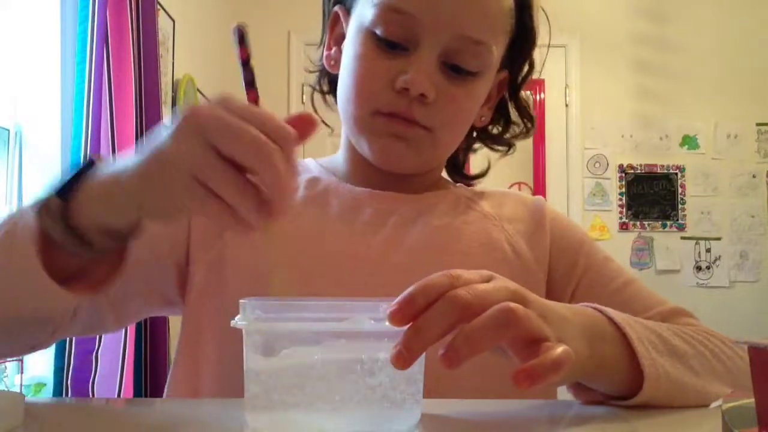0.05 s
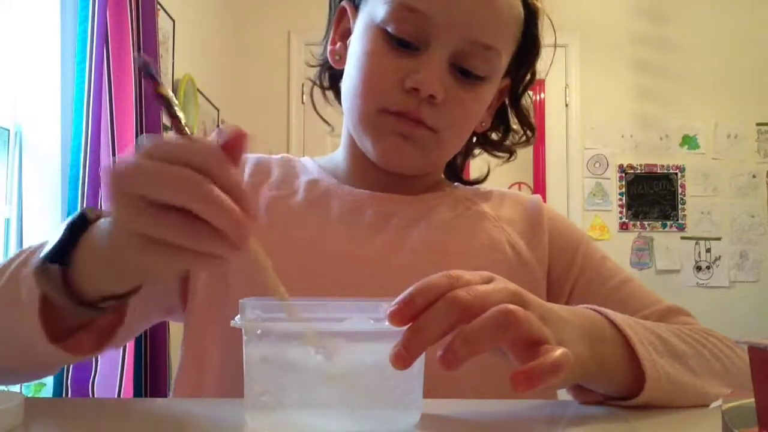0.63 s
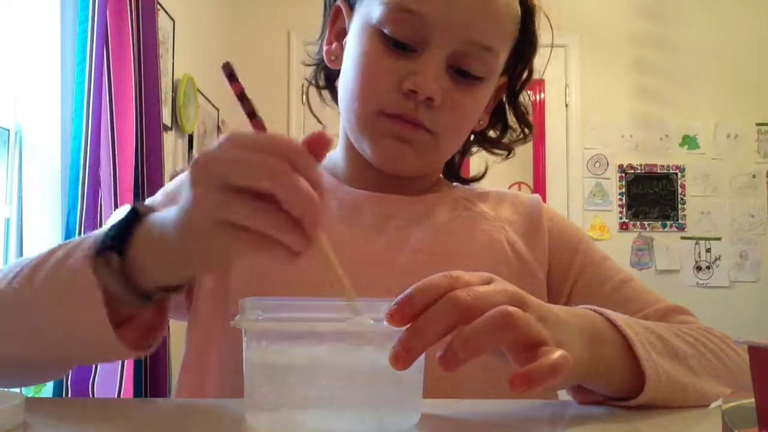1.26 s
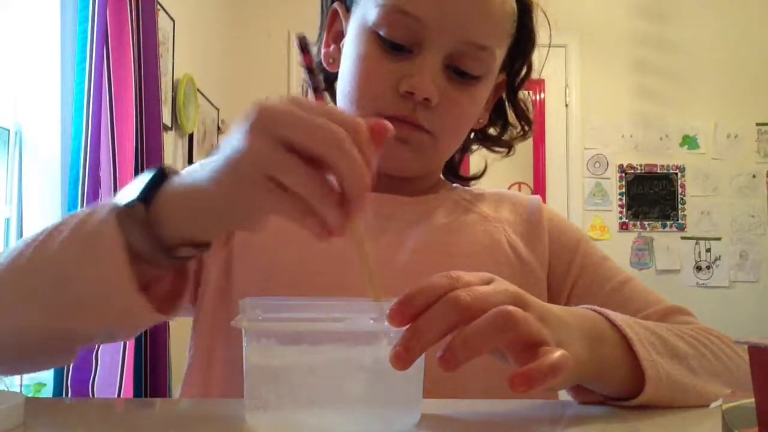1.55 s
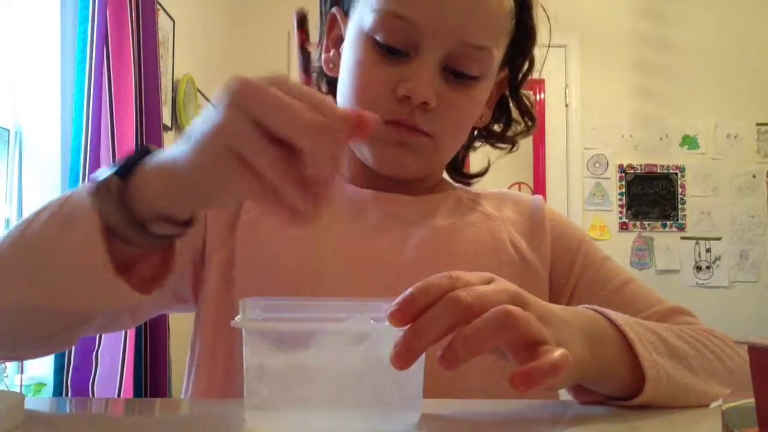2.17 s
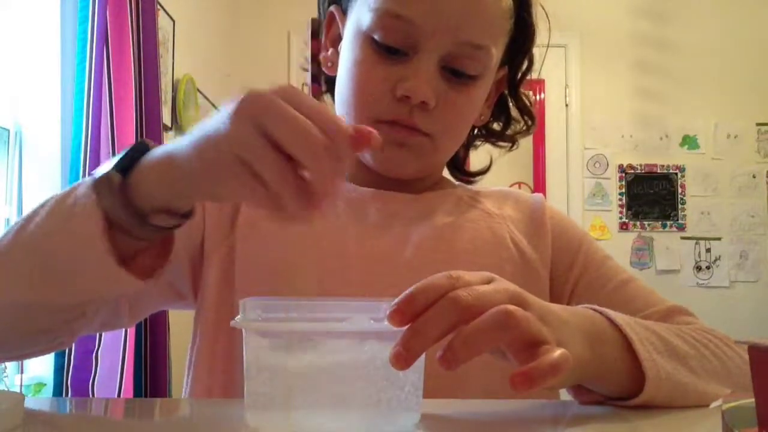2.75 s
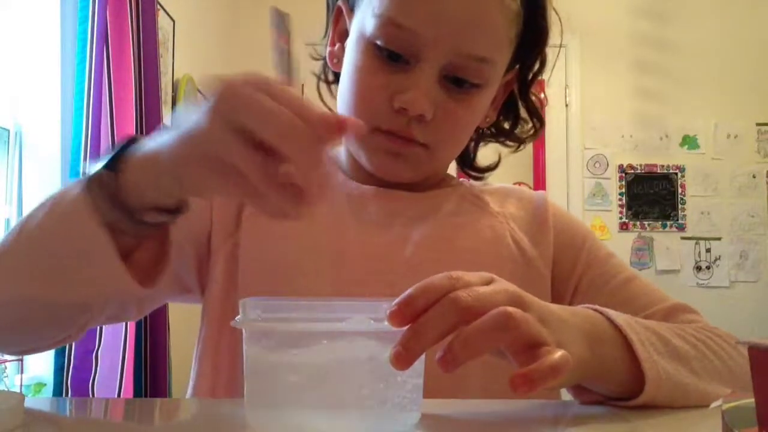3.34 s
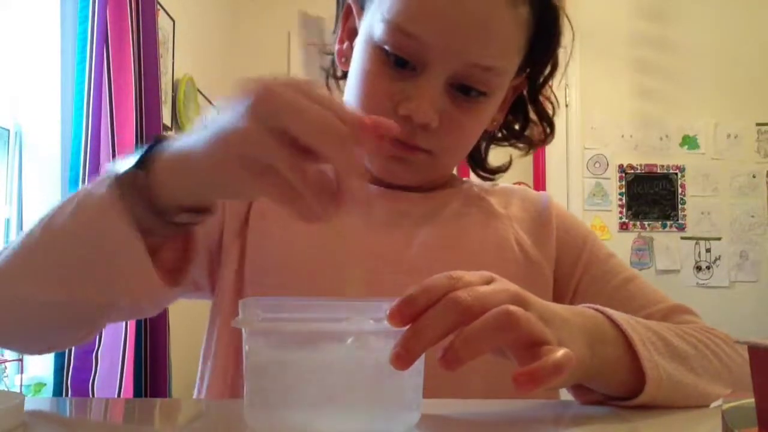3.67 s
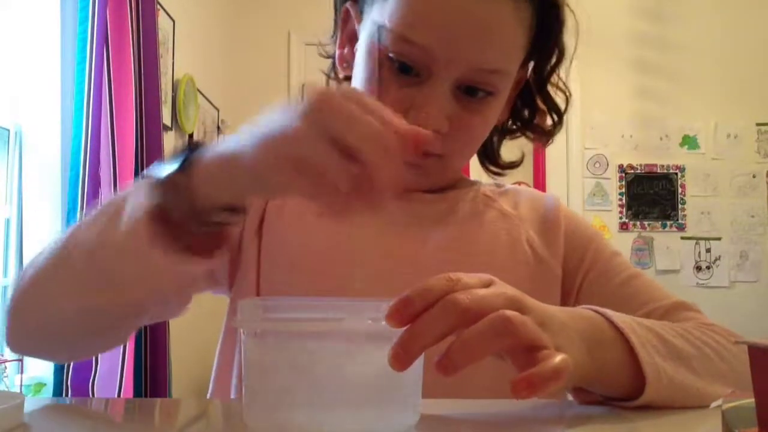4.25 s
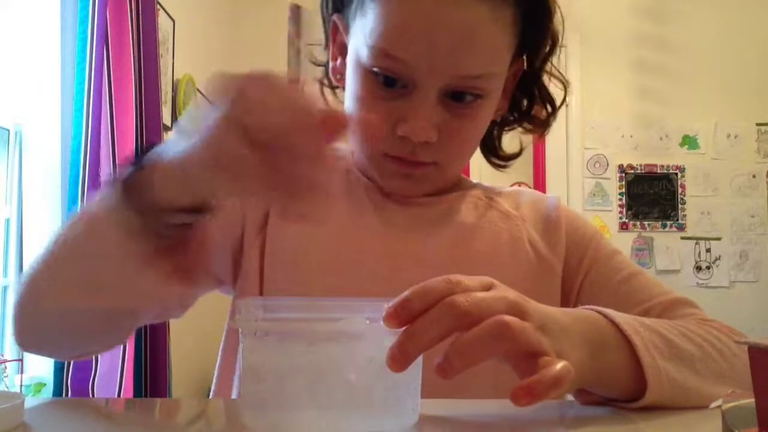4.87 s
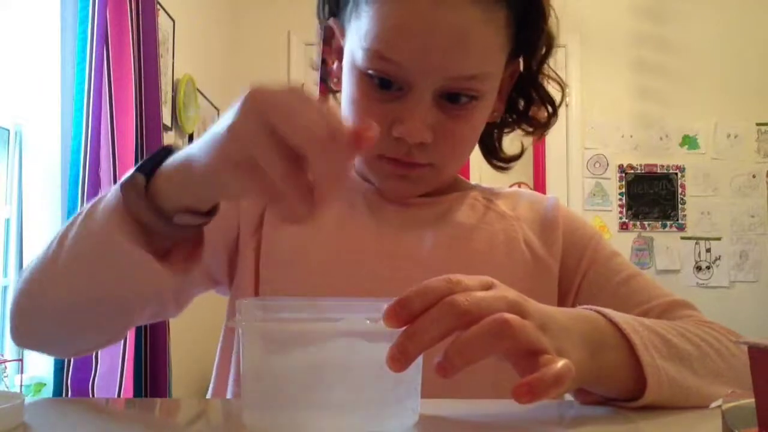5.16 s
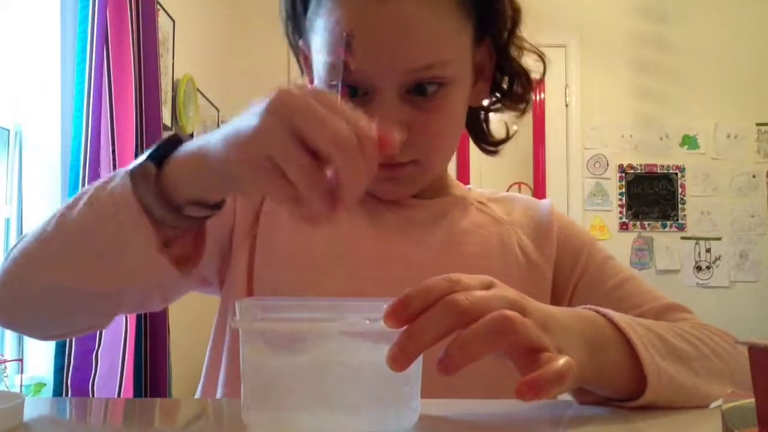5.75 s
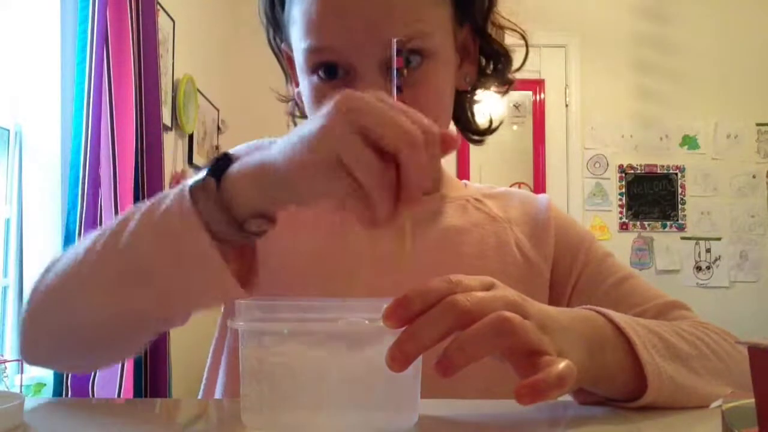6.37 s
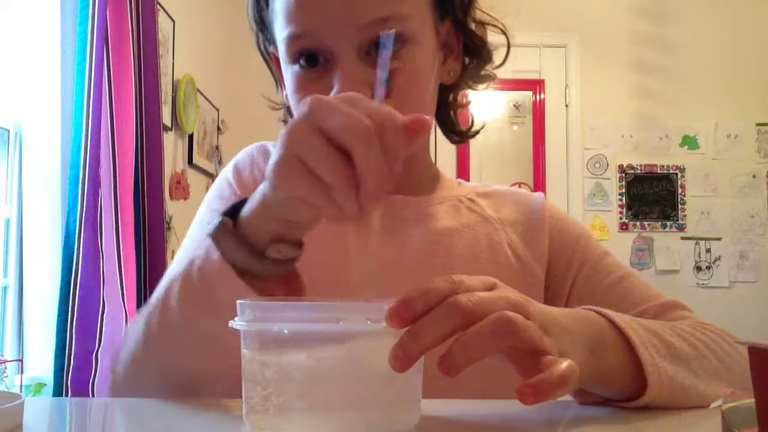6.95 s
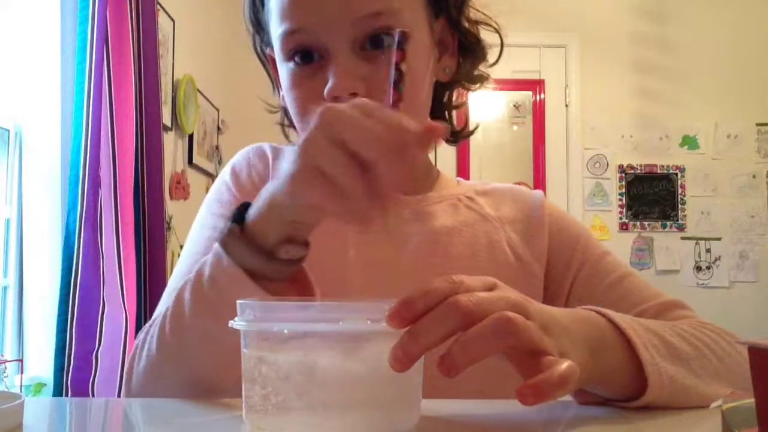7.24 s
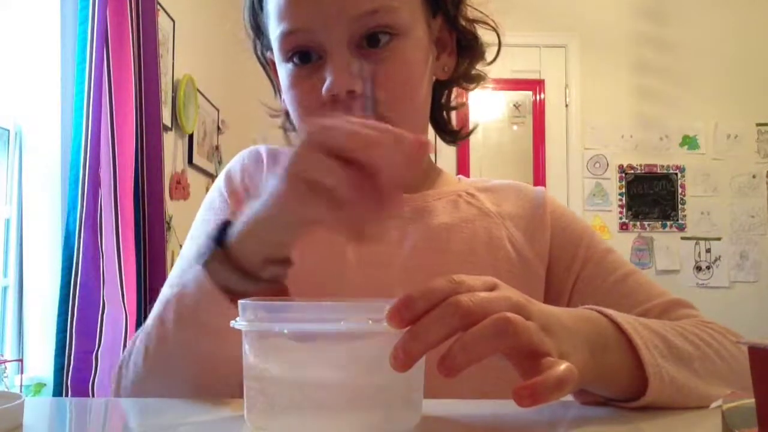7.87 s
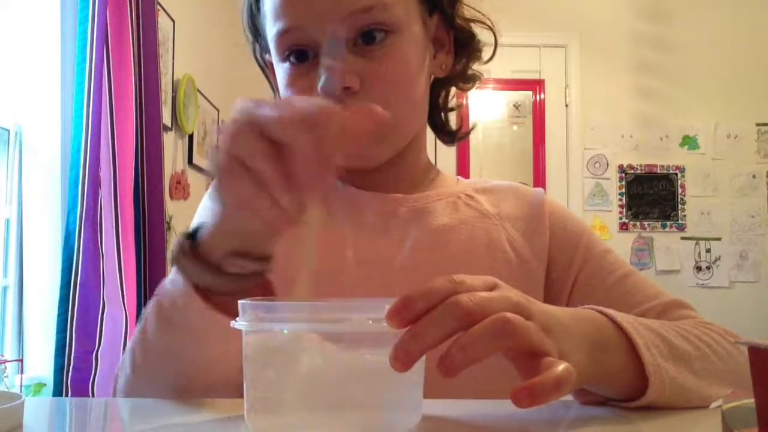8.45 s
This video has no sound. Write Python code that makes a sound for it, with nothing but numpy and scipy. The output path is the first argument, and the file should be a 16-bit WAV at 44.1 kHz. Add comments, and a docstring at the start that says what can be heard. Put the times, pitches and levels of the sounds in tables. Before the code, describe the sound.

A stick stirs a thick, foamy mixture in a plastic tub, with quick hollow knocks, short scrapes and soft squelches.

```python
"""Hollow knocks and short scrapes come several times a turn as a chopstick stirs a thick mixture in a
thin plastic tub. Each contact excites the tub's damped modes; the last few snap hard on the plastic.
Between the knocks the mixture churns and squelches, and its foam crackles with bursting bubbles.
Twice a short knock stutters, repeating evenly about every 23 ms over deep bass pulses.
A small room reverberates around the contacts, over a faint hiss."""
import sys
import numpy as np
from scipy import signal
from scipy.fft import rfft, irfft
from scipy.io import wavfile

SR = 44100
rng = np.random.default_rng(int(sys.argv[2]) if len(sys.argv) > 2 else 0)


def log_audio(samples):
    """Write samples as a 16-bit WAV file to the path given in sys.argv[1]."""
    # one column per channel
    frames = np.atleast_2d(samples).T
    # limit to full scale, then quantise
    limited = np.clip(frames, -1, 1)
    pcm = np.round(limited * 32767).astype(np.int16)
    wavfile.write(sys.argv[1], SR, pcm)


N = 375280

# spectra of the hiss, the churning mass and the foam: f/Hz, relative spectral density/dB
HISS_SPECTRUM = [(30, -19), (100, -50), (230, 20.5), (330, -5.5), (700, 8), (1100, 1), (2500, 2.5),
                 (5000, -1.5), (10000, -1.5), (15500, -5.5)]
CHURN_SPECTRUM = [(40, -24), (110, -8), (150, 4), (190, -1.5), (245, 0.5), (300, -6.5), (365, -25),
                  (460, -3), (590, -13.5), (665, -13.5), (735, -15), (810, -11.5), (950, -16),
                  (2000, -31.5)]
FOAM_SPECTRUM = [(500, -37), (1000, 4), (1450, 5), (1850, 14), (2100, -6), (2420, 17.5), (2850, -6),
                 (3300, -7), (4200, -38), (5600, 6), (6800, -16), (9500, 1), (15000, -20)]
# spectra of a crack's snap and of its higher sheen: f/Hz, relative spectral density/dB
SNAP_SPECTRUM = [(1500, -13), (3000, 6), (3900, 5.5), (4600, 5), (5300, 3.5), (6200, 3.5), (7000, -25),
                 (9000, -26.5), (15500, -54)]
SHEEN_SPECTRUM = [(3000, -45), (6300, 1), (7800, 6.5), (9200, 2.5), (10500, -0.5), (12500, -8),
                  (15500, -5.5)]
# reverberation in octave bands: f/Hz, t60/s, level/dB
ROOM_BANDS = [(151, 0.31, -10.5), (284, 0.42, -16.5), (572, 0.21, -16), (1110, 0.22, -19.5),
              (2260, 0.24, -16), (4300, 0.16, -11), (9100, 0.18, -13)]
# course of the stirring: t/s, churn level/dB, relative foam level/dB
STIR_LEVELS = [(0.0, -76, -83), (0.35, -73, -77), (0.64, -71.5, -75), (1.35, -67.5, -78), (2.56, -64, -73),
               (2.79, -60.5, -73.5), (3.34, -58, -66.5), (3.6, -59.5, -67), (3.93, -64, -70),
               (4.71, -57, -66), (5.07, -63, -75.5), (5.4, -61, -68.5), (5.94, -60.5, -71.5),
               (6.84, -63, -69), (7.55, -63.5, -79), (7.81, -70, -89), (8.21, -62.5, -70),
               (8.5, -67.5, -87)]
# the stick cuts in and out of the mixture: t/s, relative level/dB, centre f/Hz, swell time/s
SQUELCH_EVENTS = [(0.546, -56, 2560, .005), (0.584, -56, 2690, 0.0037), (0.823, -57, 2380, 0.0053),
                  (0.857, -57, 3100, .004), (1.049, -53, 4170, 0.0023), (1.868, -52.5, 2730, .005),
                  (2.598, -51.5, 2850, 0.0063), (2.975, -52.5, 2800, .008), (3.226, -53, 3300, 0.0072),
                  (3.47, -56, 2560, .005), (3.751, -53, 2350, .005), (4.137, -58, 2400, 0.0042),
                  (4.541, -47, 3000, 0.0039), (4.705, -46, 2920, 0.0039), (4.78, -49, 3600, .009),
                  (5.524, -55, 2400, .005), (5.789, -49, 3000, .002), (6.155, -51, 2390, 0.0053),
                  (6.226, -49, 3730, 0.0046), (6.47, -51, 4200, 0.0043), (7.268, -47, 2900, .007)]
# a short knock stutters: t/s, duration/s, knock/dB, thump/dB, hardness/dB, bass pulse/dB
STUTTERS = [(6.1794, .035, -45.5, 5, -12, -58), (6.606, .082, -55.5, 3, -16, -71)]
# the stick strikes bare spots of the wall: t/s, level/dB, f/Hz
WALL_PINGS = [(0.3602, -48, 2560), (4.0391, -40.5, 3080), (4.5096, -50, 4740), (4.6042, -48, 3200),
              (5.2572, -40, 5600), (5.4544, -41.5, 5460), (8.0986, -39, 6140), (8.3509, -44, 2570)]
# stick on tub: t/s, knock/dB, thump of the loaded base/dB, hardness/dB, snap/dB, drag time/ms
# thump, hardness and snap are relative to the knock; a touch cushioned by mixture has low hardness
STICK_CONTACTS = [(0.1422, -55.5, 2, -14, -14, 0.9), (0.165, -54, -6.5, -14, -28, 0.7),
                  (0.2097, -52, -11, -13, -13.5, 1), (0.3602, -40.5, -0.5, -7.5, -18.5, 0.41),
                  (0.5093, -44.5, 0, 1, -9.5, 1.3), (0.6246, -39.5, -3, -8.5, -20, 0.25),
                  (0.7396, -53.5, 5.5, -1.5, -9, 0.95), (0.8905, -44.0, 2, -20, -29.0, 1.8),
                  (0.912, -52, -8, -22, -29, 0.9), (0.9976, -40, -3, -12.5, -24, 0.4),
                  (1.096, -56, 3, 0, -19, 2.7), (1.1676, -49.5, -2, -4, -25, 1.1),
                  (1.179, -47.0, -5.0, -22, -33, 0.9), (1.2656, -39.0, -6, -14.5, -21.5, 0.82),
                  (1.321, -55.5, 3, -6, -16, 1.2), (1.4299, -37.5, -3.5, -11.0, -28, 0.9),
                  (1.4659, -45.5, -5, -7, -27, 0.9), (1.5476, -42.5, -6.5, -22, -36, 1.8),
                  (1.558, -45.0, -10, -12, -28, 0.9), (1.6174, -58, 4.5, 10.5, -5, 0.82),
                  (1.7275, -43.0, -3.5, -7.5, -38, 0.9), (1.758, -53, -5, -11, -21, 0.3),
                  (1.8426, -43.5, -4, -13.5, -25, 7.6), (2.198, -36.5, -3.0, -9.5, -29, 0.71),
                  (2.3117, -59, 6, 8.5, -4.0, 7), (2.6424, -35.5, 9.0, -13, -15.5, 3.7),
                  (2.8476, -48.5, 5, -16, -22, 1.7), (3.092, -39, 5, -5, -22, 1.1),
                  (3.113, -50.5, 2, -18, -16, 1.6), (3.2504, -37, 6.5, -1.0, -14.5, 0.42),
                  (3.273, -39.0, 9.0, -9.5, -19, 1.4), (3.3356, -42.5, 3, -3.5, -21, 0.21),
                  (3.361, -57, 6, 7.5, -1, 0.97), (3.4314, -39, 3.0, -7, -31, 1.1),
                  (3.594, -39.5, 3.5, -8.0, -28, 1.1), (3.6667, -46.5, 2, -12, -12.5, 16),
                  (3.7894, -40, -11.0, -4.5, -27, 1.3), (3.8812, -57.0, 5, -7, -13, 0.9),
                  (3.948, -38.0, -6.0, -5.5, -17, 1.6), (3.975, -48.5, -12, -8, -21, 0.36),
                  (4.0391, -41.5, -8, 2.5, -6, 0.3), (4.049, -36.0, -3.5, -16, -15, 4.8),
                  (4.0886, -49.5, 2, -8.0, -14.0, 0.99), (4.165, -45.5, 5.0, -6.5, -14, 1.1),
                  (4.2327, -37.5, -13, -3.5, -12, 2), (4.4368, -48.5, 6.5, -5.0, -16, 0.9),
                  (4.5096, -35.5, -7.0, -7.5, -7.5, 0.63), (4.6042, -36, 2, -2, -18.0, 0.33),
                  (4.7388, -38.5, -12, -18.5, -28.0, 0.9), (4.803, -67, 17, 9, 6, 2.2),
                  (4.87, -57.5, -1, -4, -6, 0.4), (4.8833, -39.5, -3.5, -19, -27, 0.82),
                  (4.9555, -41, -6.5, -18, -25.0, 0.71), (5.0716, -41, -4.5, -24, -27, 0.68),
                  (5.083, -41, -11, -19, -28.0, 3.7), (5.1396, -44.5, -2, -15.5, -26.0, 0.62),
                  (5.2298, -46, -1, -7, -12, 8.1), (5.2572, -35, -1.5, -3.5, -10.5, 0.35),
                  (5.344, -50.5, 7, -15, -10.5, 8.1), (5.359, -40.5, 3, -5.5, -28, 0.24),
                  (5.4544, -34.5, -1.0, 0.5, -5, 0.34), (5.4909, -45.5, -4, -5, -14, 1.1),
                  (5.563, -46.5, 2, -9, -20, 10.4), (5.6632, -49.5, -1, -1, -14, 4.5),
                  (5.681, -50, -16, -3.5, -7.5, 1.9), (5.7571, -47.5, -2, -17, -23, 0.9),
                  (5.8207, -55, -1, -10, -17, 5.3), (5.8477, -39.5, -11, -8.5, -17, 5),
                  (5.889, -50.5, -6, -9, -20, 0.37), (6.0221, -41.5, -7, -11, -31, 2.2),
                  (6.114, -52.0, -4, -11, -17, 0.97), (6.2463, -36.5, -9.5, -8.5, -24.0, 1),
                  (6.2905, -54.5, -10, -24, -29, 4.9), (6.3546, -54.0, 2.5, -4, -8, 0.83),
                  (6.4166, -50, -0.5, -11, -29, 4.6), (6.4519, -58, 5, 2, -12, 0.45),
                  (6.4892, -38.5, -9, -7.0, -33, 0.67), (6.5706, -45.5, -2, -23, -33, 0.9),
                  (6.591, -53, -8, -4, -3, 0.9), (6.7062, -50, 1, -14, -30, 1.4),
                  (6.7844, -47, 0.5, -24.0, -28, 1), (6.8539, -41, 2, -0.5, -6, 2.3),
                  (6.864, -42, 5.5, -6, -22, 2.6), (6.9415, -35, -12, -11, -25, 0.72),
                  (6.9961, -38.5, -7.5, -19, -45, 1), (7.0929, -34, -6, -20.5, -39, 3.5),
                  (7.1991, -45.0, -5.5, -20, -36.0, 0.82), (7.2242, -45.5, -8, -7, -31.0, 0.83),
                  (7.331, -51.5, -5, -13.0, -26, 0.68), (7.4095, -56.5, -4, -13, -27, 1.3),
                  (7.4458, -46.5, -7, -30, -34.0, 1.2), (7.5853, -57, -5, -11, -16, 19),
                  (7.739, -47, -8, -21, -37, 4.6), (7.78, -44, -11, -27, -34.0, 3),
                  (7.8802, -48, -10.0, -13, -6, 1.6), (7.898, -35.0, -8, -11.0, -24, 4.7),
                  (8.0275, -43.0, -1.5, -8, -25.0, 0.2), (8.0986, -37, -4.5, -2, 4.5, 0.57),
                  (8.1924, -48, -7, -4.5, -8.5, 1), (8.232, -55.5, -4, 4, 4, 0.74),
                  (8.242, -44.5, 2.5, -21, -14, 0.9), (8.3509, -36.0, 3.5, -6, -14.5, 0.3),
                  (8.4166, -38, -10, -2.5, 3, 0.61)]
# modes of the loaded tub: f/Hz, relative level/dB, t60/s
TUB_MODES = [(126.7, -7.5, 0.13), (161, 1.5, 0.098), (210.4, 1.5, 0.097), (246.6, 4.5, 0.099),
             (452.3, -16, 0.11), (458.6, 8, 0.047), (542, -14, 0.15), (600.7, -6.5, 0.025), (667, 0, 0.06),
             (795, 3, 0.03), (862, -3.5, 0.043), (1110, -6, 0.091), (1240, -3, 0.021), (1405.6, 7, 0.048),
             (1533, 1, 0.064), (1816, 9.5, 0.024), (1910, -1.5, 0.06), (2374, 12.5, 0.017),
             (2507, 9, 0.017), (2620, 5.5, 0.0082), (3186, 3, 0.015)]
# registers (thump, hollow, knock, clack, tick): low f/Hz, high f/Hz, gain/dB, thud re ring/dB, thud t60/s
TUB_REGISTERS = [(104, 446, -0.38, -13, 0.17), (384, 676, 1.1, -12, 0.025),
                 (600.7, 890, -0.78, -5.5, 0.017), (960, 1910, 0.62, -2, 0.02),
                 (1985, 3110, -2.05, -5.5, 0.01)]


def from_db(db):
    return 10 ** (np.asarray(db) / 20)


def rms_one(x):
    return x / np.sqrt(np.mean(x ** 2) + 1e-20)


def energy_one(x):
    return x / np.sqrt(np.sum(x ** 2) + 1e-20)


def at_level(x, db, span_s=.01):
    """Equivalent level: a transient gets the energy of a steady sound at db lasting span_s."""
    return np.sqrt(span_s * SR) * from_db(db) * energy_one(x)


def time_axis(length_s):
    return np.arange(int(length_s * SR)) / SR


def add(out, part, s):
    """Superposition: a sound joins the mix at time s."""
    start = max(0, round(s * SR))
    out[start:start + len(part)] += part[:len(out) - start]


def band(x, low_hz, high_hz):
    return signal.sosfilt(signal.butter(2, [low_hz, high_hz], "band", fs=SR, output="sos"), x)


def shaped(x, spectrum):
    """Linear filtering imposes a spectrum; a white input keeps its power."""
    hz, db = np.transpose(spectrum)
    grid_hz = np.maximum(np.fft.rfftfreq(N, 1 / SR), 1)
    gain = from_db(np.interp(np.log(grid_hz), np.log(hz), db))
    return irfft(rfft(x) * rms_one(gain), N)


def drift(per_s):
    """Random modulation: a line through Gaussian values of unit spread."""
    return np.interp(np.arange(N) / SR * per_s, np.arange(4096), rng.standard_normal(4096))


def burst(t, t60):
    """Modal overlap: countless heavily damped modes blur into a dying noise."""
    return rng.standard_normal(len(t)) * from_db(-60 * t / t60)


def hiss(level_db=-68):
    """Stationary coloured noise forms a faint floor."""
    return from_db(level_db) * rms_one(shaped(rng.standard_normal(N), HISS_SPECTRUM))


def room(x, first_echo_s=.007):
    """Reverberation: dense reflections decay exponentially, each octave at its own rate."""
    t = time_axis(.5)
    tail = np.zeros(len(t))
    for hz, t60, db in ROOM_BANDS:
        low_hz = hz / np.sqrt(2)
        echoes = band(rng.standard_normal(len(t)), low_hz, 2 * low_hz) * from_db(-60 * t / t60)
        bandwidth_gain = np.sqrt(low_hz / (SR / 2))
        add(tail, from_db(db) * bandwidth_gain * energy_one(echoes), first_echo_s)
    return signal.fftconvolve(x, tail)[:N]


def mixture(lumps_per_s=35, pops_per_s=450, lump_spread_db=4, clump_spread_db=3):
    """Modulated noise and shot noise: the mass churns in lumps and foam bubbles burst in clumps."""
    s, churn_db, foam_db = np.transpose(STIR_LEVELS)
    t = np.arange(N) / SR
    churn = rms_one(shaped(rng.standard_normal(N), CHURN_SPECTRUM))
    churn *= from_db(np.interp(t, s, churn_db) + lump_spread_db * drift(lumps_per_s))
    sizes_db = 6 * np.minimum(rng.exponential(1, N), 4)  # many small pops, few large
    pops = from_db(sizes_db) * rng.choice([-1, 1], N) * (rng.random(N) < pops_per_s / SR)
    foam = rms_one(shaped(pops, FOAM_SPECTRUM))
    foam *= from_db(np.interp(t, s, foam_db) - 1 + clump_spread_db * drift(lumps_per_s))
    return churn + foam


def stutter_repeats(period_s=.0235):
    """Periodic repetition makes a knock stutter: t/s, knock/dB, thump/dB, hardness/dB, bass pulse/dB."""
    return [(s + age, *levels) for s, length_s, *levels in STUTTERS
            for age in np.arange(0, length_s, period_s)]


def stutter_bass(t60=.06):
    """Band-limited exponential decay: a short, deep bass pulse under each repeat of the stutter."""
    out = np.zeros(N)
    pulse = band(from_db(-60 * time_axis(.14) / t60), low_hz=38, high_hz=95)
    for s, *_, db in stutter_repeats():
        add(out, at_level(pulse, db), s)
    return out


def squelches(gain_db=-6.5, pops_per_s=3500, edge_ratio=1.68):
    """Shot noise: each squelch is a quick swell of tiny bursting bubbles."""
    out = np.zeros(N)
    t = time_axis(.05)
    for s, db, hz, swell_s in SQUELCH_EVENTS:
        pops = (rng.random(len(t)) < pops_per_s / SR) * rng.standard_normal(len(t))
        swell = t / swell_s * np.exp(-t / swell_s)
        squelch = band(pops * swell, hz / edge_ratio, hz * edge_ratio)
        add(out, at_level(squelch, db + gain_db, span_s=.005), s - swell_s / 2)
    return out


def pings(t60=.013, edge_ratio=1.08):
    """Resonance: a tight cluster of wall modes rings briefly around one pitch."""
    out = np.zeros(N)
    t = time_axis(.05)
    for s, db, hz in WALL_PINGS:
        ring = band(burst(t, t60), hz / edge_ratio, hz * edge_ratio)
        add(out, at_level(ring, db), s)
    return out


def touches(brushes_per_s=3, brush_db=-61.5, brush_spread_db=3.5):
    """Touches in STICK_CONTACTS columns: firm contacts, dull brushes, and each evenly spaced repeat of the
    stutter."""
    repeats = [(s, db, thump_db, hard_db, -18, .3) for s, db, thump_db, hard_db, _ in stutter_repeats()]
    delay, strength = rng.standard_normal((100, 2)).T
    times = (np.arange(100) + .6 * np.abs(delay)) / brushes_per_s
    levels_db = brush_db + brush_spread_db * strength
    brushes = [(s, db, .5, -11, -13.5, 3.5) for s, db in zip(times, levels_db) if s < N / SR]
    return [*STICK_CONTACTS, *repeats, *brushes]


def tick_level(hard_db):
    """Contact stiffness: the harder the touch, the stronger the top register, in dB re the knock."""
    return .8 + 1.22 * hard_db


def cracks(contacts, gain_db=-.5, graze_db=-15, clean_t60=.015, grit_db=3):
    """Impact and friction noise: a clean hit cracks; a dragging stick grazes first, then scrapes."""
    snaps, sheens, grazes = np.zeros((3, N))
    t = time_axis(.06)
    for s, knock_db, _, hard_db, snap_db, drag_ms in contacts:
        # the sheen grows with the drag and flares once the snap outweighs the knock
        sheen_db = snap_db - 6.5 + 1.5 * np.log2(drag_ms) + 1.32 * max(snap_db, 0)
        drag_s = drag_ms / 1000
        t60 = clean_t60 + 3.2 * drag_s
        lead_s = min(1.4 * drag_s, .004)
        grit = from_db(grit_db * rng.standard_normal(len(t)))
        for track, db, start in ((snaps, snap_db + gain_db, s), (sheens, sheen_db + gain_db, s),
                                 (grazes, tick_level(hard_db) + graze_db, s - lead_s)):
            add(track, at_level(grit * burst(t, t60), knock_db + db), start)
    return shaped(snaps, SNAP_SPECTRUM) + shaped(sheens, SHEEN_SPECTRUM) + shaped(grazes, FOAM_SPECTRUM)


def friction(t, drag_ms, slips_per_s=3000, slip_size=.47):
    """Sliding friction: a first impulse, then tiny slips that fade as the stick slides off."""
    slips = (rng.random(len(t)) < slips_per_s / SR) * rng.standard_normal(len(t))
    force = slip_size * slips * np.exp(-t * 1000 / drag_ms)
    force[0] = 1
    return force


def struck_modes(t, spread_db=2, detune_share=.01):
    """Dispersion: bending waves are slower at low pitch, so low modes start late; one row a mode."""
    hz, db, t60 = np.transpose(TUB_MODES)[:, :, None]
    # each point of contact gives a mode its own strength, tuning and path round the wall
    strength, detune, path = rng.standard_normal((3, len(hz), 1))
    lag_s = .001004 * np.abs(1 + .544 * path) * np.sqrt(1000 / hz)
    age = np.maximum(t - lag_s, 0)
    envelope = from_db(db + spread_db * strength - 60 * age / t60)
    return envelope * np.sin(2 * np.pi * hz * (1 + detune_share * detune) * age)


def knocks(contacts, lead_s=.0008, low_slip_share=.55, low_cut_hz=113):
    """Forced vibration: the contact force is convolved with the tub's response in five registers."""
    out = np.zeros(N)
    t = time_axis(.14)
    mode_hz = np.array(TUB_MODES)[:, 0]
    for s, knock_db, thump_db, hard_db, _, drag_ms in contacts:
        modes = struck_modes(t)
        force = friction(t, drag_ms)
        push = np.r_[1, low_slip_share * force[1:]]  # the heavy low modes feel less of the slips
        drives = ((push, thump_db),
                  (push, -1.48 + .3 * thump_db),  # a heavy blow fills the hollow register
                  (push, 2.1 - .15 * thump_db),  # and deadens the knock register
                  (force, -1.25 + .54 * hard_db),  # a hard touch brings out the clack
                  (force, tick_level(hard_db)))
        for (low_hz, high_hz, gain_db, thud_db, thud_t60), (drive, drive_db) in zip(TUB_REGISTERS, drives):
            inside = (mode_hz >= low_hz) & (mode_hz < high_hz)
            ring = band(modes[inside].sum(axis=0), low_hz, high_hz)
            thud = band(burst(t, thud_t60), low_hz, high_hz)  # where mixture clings, the wall only thuds
            response = energy_one(ring) + from_db(thud_db) * energy_one(thud)
            wall = signal.fftconvolve(response, drive)[:len(t)]
            add(out, at_level(wall, knock_db + drive_db + gain_db), s - lead_s)
    # the deepest bass is cut away steeply
    return signal.sosfilt(signal.butter(4, low_cut_hz, "high", fs=SR, output="sos"), out)


def scene():
    """Direct and reverberant sound add: tub and mixture close by, the room behind them."""
    contacts = touches()
    taps = knocks(contacts) + cracks(contacts) + pings() + squelches()
    return (hiss() + room(taps) + mixture() + stutter_bass() + taps)[None]


def record(dry, cutoff_hz=16000):
    """Band limiting: a steep low-pass filter removes the highest treble."""
    return signal.sosfilt(signal.ellip(10, .1, 80, cutoff_hz, fs=SR, output="sos"), dry)


dry = scene()
out = record(dry)
log_audio(out)
```